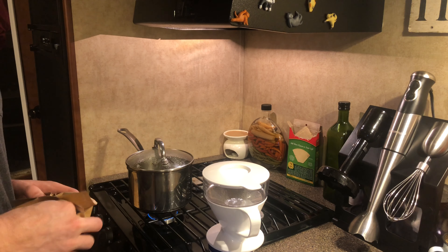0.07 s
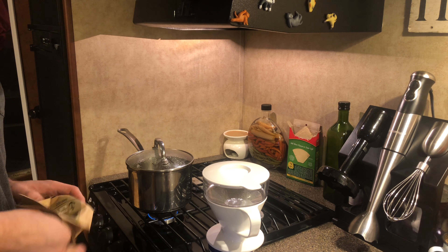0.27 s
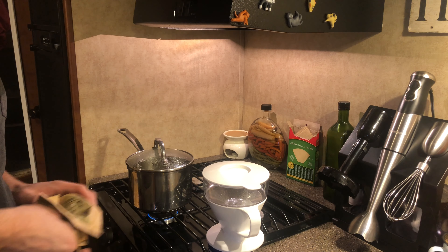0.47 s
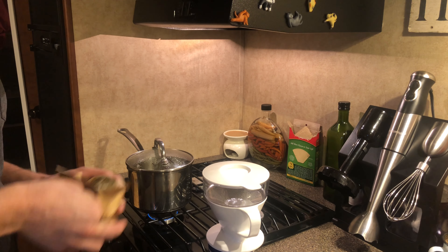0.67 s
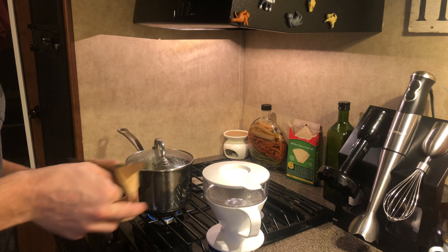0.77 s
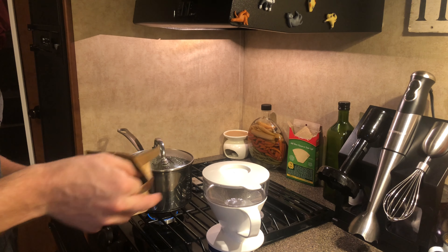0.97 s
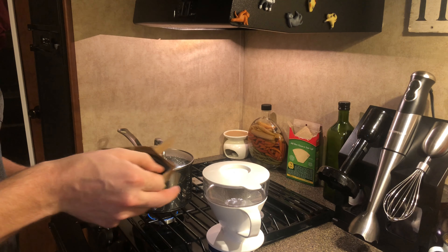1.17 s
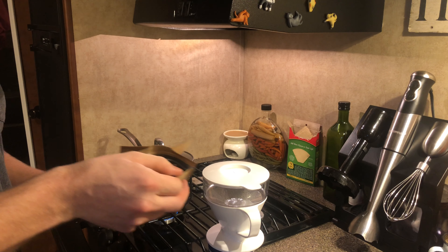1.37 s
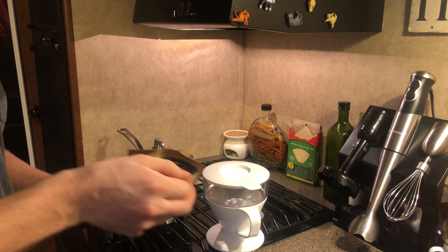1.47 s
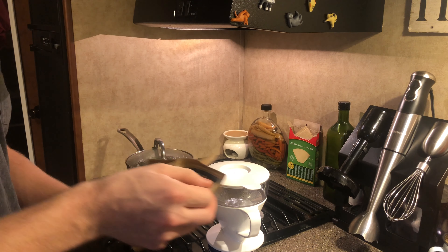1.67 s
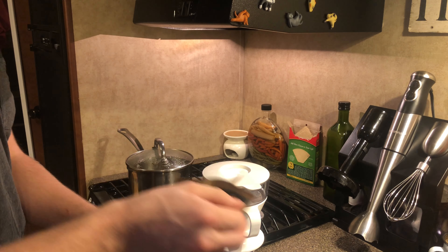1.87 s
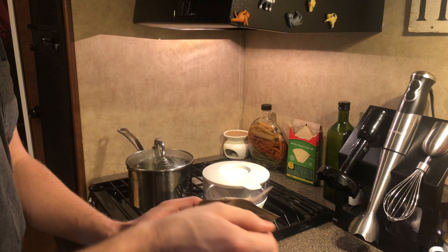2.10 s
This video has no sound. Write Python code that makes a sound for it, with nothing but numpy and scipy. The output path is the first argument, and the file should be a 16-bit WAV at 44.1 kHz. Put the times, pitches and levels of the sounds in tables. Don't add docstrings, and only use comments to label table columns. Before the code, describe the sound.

A stiff paper coffee pouch crackles in the hands, close to a phone in a small kitchen. Crisp snaps and hollow buckles start at once over a dry grainy rustle, with the sharpest crack near 0.5 s. From 0.65 s it softens into scattered crinkles and finger drags, with a last cluster near 1.25 s. Then mostly low room rumble and faint gas hiss, with slight finger brushes around 1.8 s and a tiny crinkle near 2.07 s.

```python
import sys
import numpy as np
from scipy import signal
from scipy.io import wavfile

SR = 44100
rng = np.random.default_rng(int(sys.argv[2]) if len(sys.argv) > 2 else 0)


def amplitude_ratio(level_db):
    exponent = np.asarray(level_db, float) / 20
    return 10 ** exponent


def to_wav(s):
    ch = np.atleast_2d(s).T
    pcm = np.round(np.clip(ch, -1, 1) * 32767)
    wavfile.write(sys.argv[1], SR, pcm.astype(np.int16))


N = 94197

# frequency [Hz], level [dB per Hz].
ROOM_SPECTRUM = [(12, -41), (20, -10.5), (77, -4), (177, -15.5), (527, -22.5), (897, -23.5), (1060, -22),
                 (1330, -23), (16000, -44.5)]
# frequency [Hz], width [Hz], level [dB].
BURNER_WHISTLES = [
    (1085, 43.5, -74.5),
    (1550, 45, -78),
]
# frequency [Hz], time to fall 60 dB [s].
TAIL_T60 = [(250, 0.17), (1000, 0.17), (4000, 0.12), (12000, 0.2)]
# time [s], rustle level [dB], brightness [dB per octave].
HANDLING = [(0,-40.5,0),(.085,-46.5,3),(0.118,-39,1.5),(.3,-33,1.5),(.36,-38.5,1),(.42,-34.5,1),(0.459,-37.5,2.5),(0.488,-42.5,1),(0.538,-36.5,2.5),(.62,-41.5,0),(.66,-38.5,2),(0.789,-42.5,1.5),(.86,-51.5,2.5),(.96,-49,-1),(1.05,-49,2),(1.14,-56,0),(1.219,-54,-2),(1.359,-80,-9)]
# frequency [Hz], level [dB per Hz].
RUSTLE_COLOUR = [(88, -39), (150, -10), (555, -2.5), (941, -4), (2060, -1.5), (2500, -5.5), (3620, -8.5),
                 (14200, -32), (16000, -34)]
# start [s], length [s].
DRAG_SPANS = [(.878,.02),(1.2,.025),(.319,.016),(.811,.02),(.708,.014),(.945,.015),(.975,.018),(1.79,.02),(1.887,.045),(.405,.015),(.64,.19),(.84,.27),(2.055,.04),(1.255,.07),(.881,.02),(.811,.022),(.939,.02),(1.04,.02),(1.157,.02),(.43,.035),(.505,.03),(.88,.025),(1.218,.018),(.392,.012),(.011,.006),(.1745,.006),(.2535,.005),(.502,.006),(.66,.1),(.972,.02),(.215,.06),(.74,.04),(1.895,.035),(.537,.05),(.255,.1),(1.305,.02)]
# level [dB], centre [Hz], width [Hz].
DRAG_SOUNDS = [(-41,3000,1600),(-51.5,2000,2800),(-35.5,580,1430),(-44.5,2200,2500),(-36.5,2000,1800),(-46.5,1500,1200),(-49,520,2100),(-61,2400,2500),(-60.5,3100,630),(-34,1900,3400),(-50.5,12400,4300),(-61,11800,2400),(-57.5,1200,3400),(-52.5,1500,2050),(-40,1200,1540),(-40.5,450,740),(-47,3200,3200),(-58,4700,4800),(-58,6000,4000),(-41.5,830,600),(-46,370,190),(-51,380,190),(-62,5000,1900),(-42,2900,1000),(-39,13300,4400),(-39,12500,5000),(-41,16000,4500),(-36,13000,5000),(-48,1230,560),(-51,1900,1000),(-50.5,150,130),(-49.5,270,190),(-65,5100,5600),(-41,590,400),(-45.5,7800,3000),(-54.5,720,400)]
# start [s], peak [dB], frequency [Hz], time to fall 60 dB [s].
RINGS = [(.1775,-37,620,0.056),(.2145,-26,353,0.046),(.2145,-31,1000,0.096),(.323,-27.5,580,0.1),(.324,-29.5,816,.07),(.633,-24,1240,0.051),(.633,-27.5,1440,0.06),(.909,-37,740,0.11),(.956,-46,450,0.084),(1.001,-36.5,1240,0.046),(1.012,-38.5,860,0.068),(1.07,-36,890,0.064),(1.109,-42,3300,0.058),(1.116,-49,875,.07),(1.2485,-29.5,325,0.063),(1.2475,-36,517,0.093),(1.2475,-32,750,.07),(1.247,-33,598,0.082),(1.25,-39.5,868,0.078),(.5055,-18.5,4900,0.018),(1.068,-40,1150,.05),(.502,-25.5,7200,0.027),(0.2,-21.5,3500,0.033),(.216,-30.5,417,.08),(1.023,-41.5,800,0.043),(.537,-42,700,0.079),(0.9,-34,2050,0.041),(0.019,-29,3400,.04)]
# time [s], peak [dB], ring [Hz], broad crack [dB], rebound [dB].
SNAPS = [(.0104,-14.5,5840,-0.5,-18),(.0142,-10,3200,-15,-13),(.0958,-17.5,3660,-8,-4),(.1738,-13,3400,7,1.5),(.2528,-17,3830,10.5,-11),(.3236,-16.5,4400,-25,2),(.379,-27,4080,1.5,-8),(.4044,-20.5,4400,3,-5),(.5013,-6.5,5110,-8,-1.5),(.632,-23.5,3440,-0.5,8),(.7416,-32.5,5600,6,-6),(.7852,-26,3430,-2,-15),(.8095,-31,2480,7,8),(.877,-40,8000,4.5,-5),(.9055,-18.5,4320,-2.5,-12.5),(1.0,-32.5,3500,2.5,14),(1.0085,-28.5,4270,3,7),(1.067,-33.5,3770,8,-7),(1.1075,-36.5,5600,6.5,12),(1.1705,-45,4140,-8.5,22),(1.2455,-21.5,3550,-1.5,2.5),(2.0662,-42.5,6500,5,4)]
# time [s], peak [dB], ring [Hz], broad crack [dB], rebound [dB].
BUCKLES = [(.037,-23.5,2100,6.5,5.5),(.174,-9.5,2770,-18,-3),(.211,-20,2530,-3,10),(.213,-25,1010,-12,11),(.322,-19,2300,-4,12),(.326,-22,850,-14,-1),(.376,-25.5,2720,-10,10),(.394,-25.5,2060,-4,5),(.433,-22.5,1180,2,-10),(.448,-20.5,1940,-12,-13),(.521,-28,1800,2,12),(.632,-13,1360,-34,-6),(.7698,-35,1330,15.5,6),(.818,-24,2010,-8,12),(.907,-34.5,1510,15.5,-3),(.95,-28,1920,-12,-3),(1.0,-33.5,1280,7,11),(1.071,-24.5,1900,-2,12),(1.067,-30,1130,-8,12),(1.114,-46,950,8,19),(1.170,-35.5,1730,-1,12),(1.246,-31.5,1160,16,4.5),(1.31,-55,743,-7,-9),(2.068,-48,2000,4,10.5)]
# time [s], peak [dB], ring [Hz], broad crack [dB], rebound [dB].
KNOCKS = [(.014,-35,470,4,2),(.177,-24.5,535,-3.5,-10),(.215,-19.5,380,-7.5,13),(.296,-30,540,-11,1),(.327,-23.5,560,-1.5,-17),(.537,-24,597,-19,-8),(.955,-37.5,430,-15,-19),(1.2475,-37.5,300,5.5,-7),(2.07,-53,600,3,0)]
# time [s], peak [dB], ring [Hz], broad crack [dB], rebound [dB].
TICKS = [(.7665,-31.5,9800,1,6),(.8885,-53,11000,-8,-19.5),(.9405,-44,11100,-11,-11.5),(.9815,-34,14500,0,-8),(.989,-53,15040,-6,-5),(.999,-40,14500,-5,-11.5),(1.151,-37.5,14500,1,-8),(1.1585,-46,9900,9,-17),(1.1835,-55,14000,-7,-8),(1.2715,-48,13400,-10,-11),(1.277,-38,13050,-0.5,-1.5),(2.0465,-50,14000,0.5,-5)]
BURST_S = [
    .0005,
    .001,
    .002,
    .0004,
]

ROOM_DB = -58.5
TAIL_DB, TAIL_START_S = -9, 0.0039
GRAINS_PER_S, GRAIN_SPREAD_DB, PATCH_DB = 2500, 3.5, 3
RING_RISE_S, RING_WOBBLE_DB = 0.0012, -2
REBOUND_S, LATE_S = 0.0037, 0.0008
SHUDDER_S, SHUDDER_DB = 0.008, -12
TOP_HZ = 16000


def rms_one(x):
    return x / np.sqrt(np.mean(x ** 2) + 1e-20)


def at_hz(points, hz):
    table = np.array(points)
    return np.interp(np.log(hz), np.log(table[:, 0]), table[:, 1])


def bands():
    edges = 20 * 2 ** np.arange(0, 10, 0.5)
    return [(signal.butter(2, [low, high], "band", fs=SR, output="sos"), np.sqrt(low * high))
            for low, high in zip(edges, edges[1:])]


def drift(rate_hz):
    r = np.exp(-2 * np.pi * rate_hz / SR)
    wander = signal.lfilter([1], [1, -2 * r, r * r], rng.standard_normal(N + SR))
    return rms_one(wander[SR:])


def resonance(x, hz, width_hz):
    r = np.exp(-np.pi * width_hz / SR)
    return signal.lfilter([1, 0, -1], [1, -2 * r * np.cos(2 * np.pi * hz / SR), r * r], x)


def resonance_twice(x, hz, first_width_hz, second_width_hz):
    return resonance(resonance(x, hz, first_width_hz), hz, second_width_hz)


def background():
    white = rng.standard_normal((2, N + SR))
    hiss = np.zeros(N)
    for k, (sos, hz) in enumerate(bands()):
        hiss += amplitude_ratio(at_hz(ROOM_SPECTRUM, hz)) * signal.sosfilt(sos, white[k % 2])[SR:]
    whistles = np.zeros(N)
    for hz, width_hz, db in BURNER_WHISTLES:
        whistles += amplitude_ratio(db) * rms_one(resonance_twice(white[0], hz, width_hz, width_hz)[SR:])
    return amplitude_ratio(ROOM_DB) * rms_one(hiss) + whistles


def kitchen(x):
    t = np.arange(SR // 2) / SR
    white = rng.standard_normal((2, len(t)))
    tail = np.zeros(len(t))
    for k, (sos, hz) in enumerate(bands()[4:]):
        tail += signal.sosfilt(sos, white[k % 2]) * amplitude_ratio(-60 * t / at_hz(TAIL_T60, hz))
    onset = np.clip(t / TAIL_START_S - 0.5, 0, 1)
    reply = amplitude_ratio(TAIL_DB) * tail / np.sqrt(np.sum(tail ** 2)) * onset
    reply[0] += 1
    return signal.fftconvolve(x, reply)[:N]


def rustle():
    times, db, brightness = np.transpose(HANDLING)
    t = np.arange(N) / SR
    level = np.interp(t, times, db, right=-120)
    tilt = np.interp(t, times, brightness)
    spread = np.minimum(rng.exponential(1, (2, N)), 3)
    sizes = amplitude_ratio(GRAIN_SPREAD_DB * spread) * rng.choice([-1, 1], (2, N))
    grains = sizes * (rng.random((2, N)) < GRAINS_PER_S / SR) + 1e-18
    coloured = []
    for k, (sos, hz) in enumerate(bands()[5:]):
        coloured.append((amplitude_ratio(at_hz(RUSTLE_COLOUR, hz)) * signal.sosfilt(sos, grains[k % 2]), hz))
    scale = np.sqrt(np.mean(sum(band for band, hz in coloured) ** 2))
    out = np.zeros(N)
    for band, hz in coloured:
        patches = PATCH_DB * np.tanh(drift(30))
        out += band * amplitude_ratio(level + tilt * np.log2(hz / 2000) + patches)
    return out / scale


def drags():
    t = np.arange(N) / SR
    friction = rng.standard_normal(N) * amplitude_ratio(4 * np.tanh(drift(300)))
    out = np.zeros(N)
    for (start, length), (db, hz, width_hz) in zip(DRAG_SPANS, DRAG_SOUNDS):
        swell = np.sin(np.pi * np.clip((t - start) / length, 0, 1)) ** 0.5
        out += amplitude_ratio(db) * rms_one(resonance_twice(friction, hz, width_hz, 2 * width_hz)) * swell
    return out


def rings():
    t = np.arange(N) / SR
    wobble = amplitude_ratio(RING_WOBBLE_DB * np.tanh(drift(60)))
    out = np.zeros(N)
    for start, db, hz, t60 in RINGS:
        after = np.maximum(t - start, 0)
        envelope = amplitude_ratio(db - 60 * after / t60) * (1 - np.exp(-after / RING_RISE_S))
        out += envelope * np.sin(2 * np.pi * hz * after)
    return wobble * out


def strikes(rows, burst_s, sharpness, crack_top_hz):
    out = np.zeros(N + SR)
    t = np.arange(3000) / SR
    low = signal.butter(1, crack_top_hz, fs=SR, output="sos")
    ragged = rng.standard_normal((len(rows), len(t)))
    for (s, db, hz, crack_db, rebound_db), noise in zip(rows, ragged):
        first = np.tanh(noise + (t == 0) * 2) * np.exp(-t / burst_s)
        rebound = amplitude_ratio(min(rebound_db, 0)) * np.roll(first, int(REBOUND_S * SR))
        shudder_level = amplitude_ratio(SHUDDER_DB + np.clip(rebound_db, 0, 12))
        shudder = shudder_level * np.tanh(noise) * np.exp(-t / SHUDDER_S)
        burst = first + rebound + shudder
        ring = resonance_twice(burst, hz, hz / sharpness, hz / sharpness)
        high = signal.butter(2, 0.4 * hz, "high", fs=SR, output="sos")
        crack = signal.sosfilt(np.vstack([low, low, high, high]), burst)
        blow = ring / abs(ring).max() + amplitude_ratio(crack_db) * crack / abs(crack).max()
        i = int((s + LATE_S) * SR)
        out[i:i + len(t)] += amplitude_ratio(db - 3.5) * blow
    return out[:N]


def pouch():
    snap_s, buckle_s, knock_s, tick_s = BURST_S
    blows = strikes(SNAPS, snap_s, 1.51, 6500) + strikes(BUCKLES, buckle_s, 2.4, 3400)
    blows += strikes(KNOCKS, knock_s, 1.55, 1100) + strikes(TICKS, tick_s, 1.8, 8800)
    return blows + rustle() + drags() + rings()


def scene():
    return (kitchen(pouch()) + background())[None]


def roll_off(x):
    return signal.sosfilt(signal.butter(12, 16990, fs=SR, output="sos"), x)


def record(dry):
    shelf = signal.cheby2(14, 22, TOP_HZ, fs=SR, output="sos")
    mix = signal.sosfilt(shelf, dry)
    return roll_off(mix)


dry = scene()
out = record(dry)
to_wav(out)
```